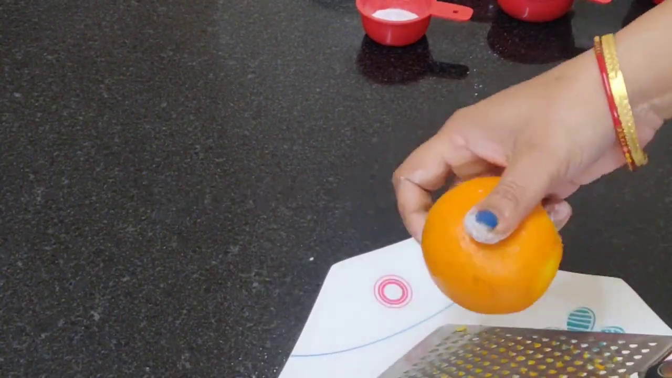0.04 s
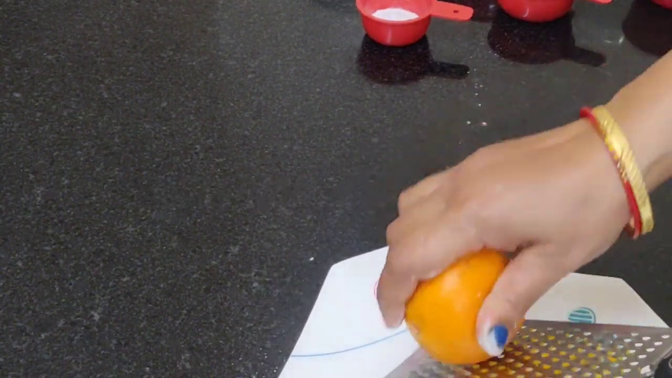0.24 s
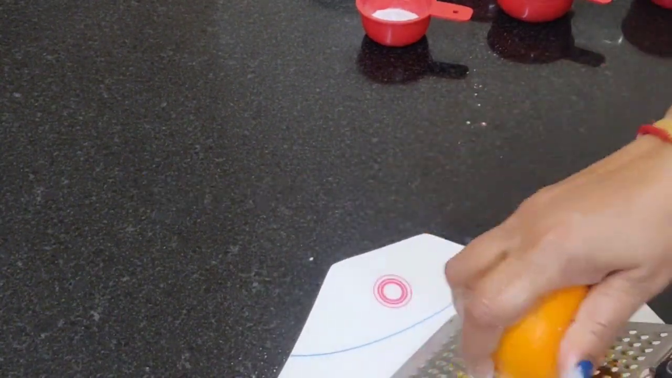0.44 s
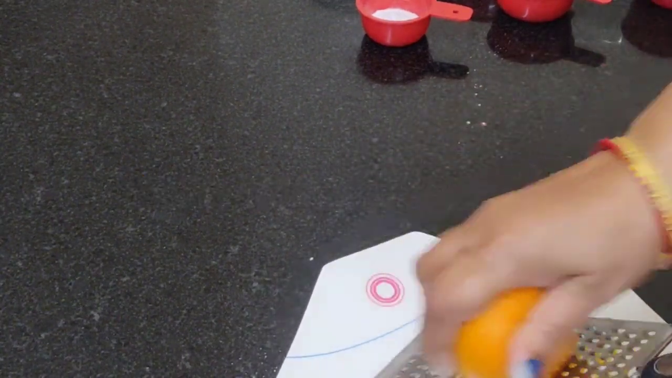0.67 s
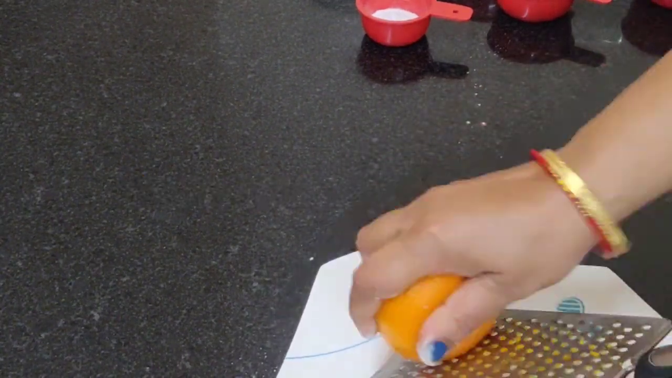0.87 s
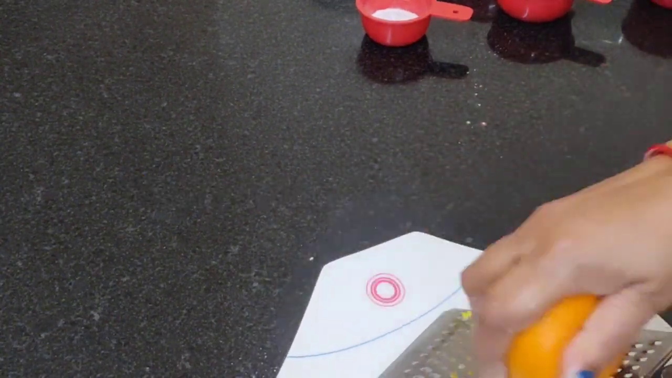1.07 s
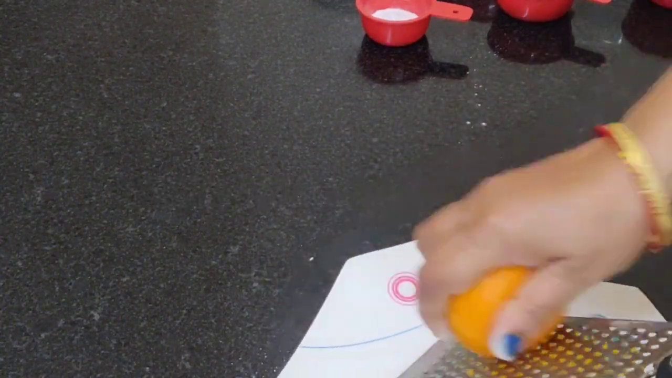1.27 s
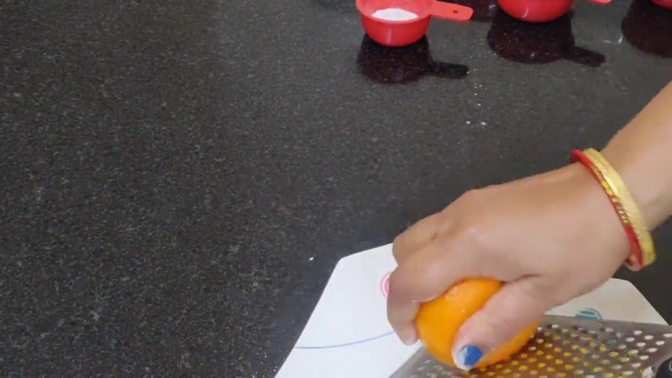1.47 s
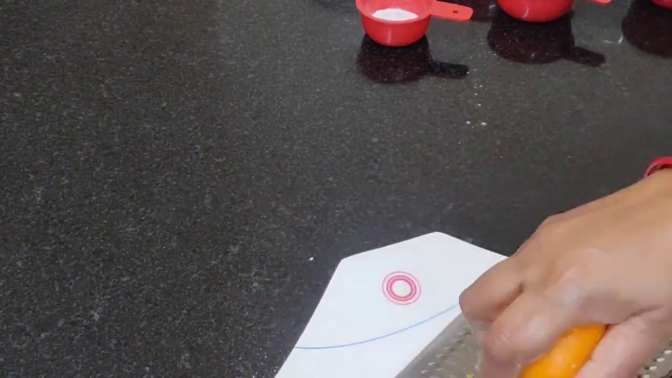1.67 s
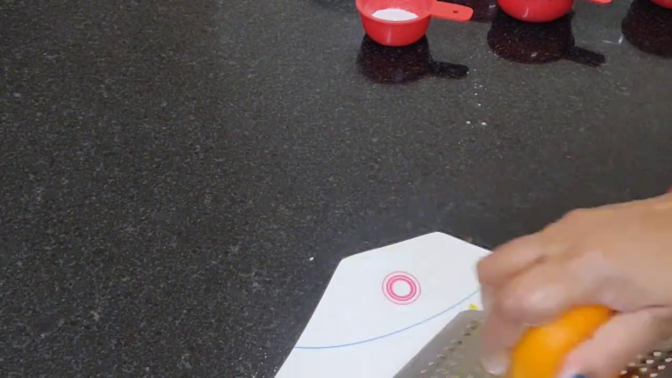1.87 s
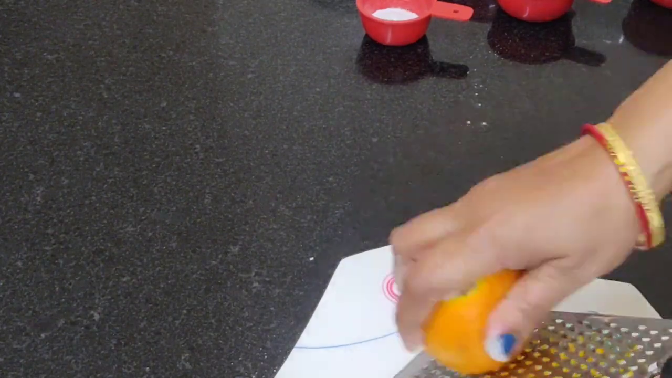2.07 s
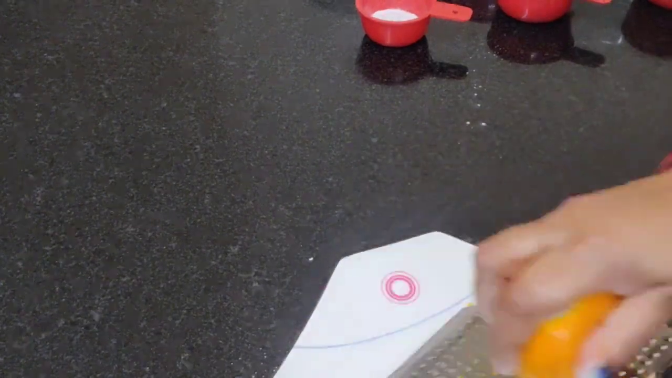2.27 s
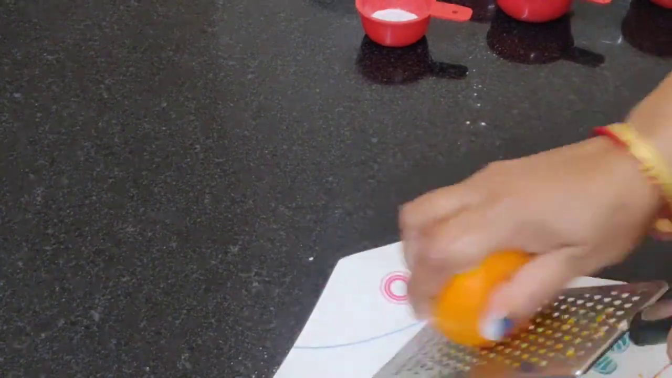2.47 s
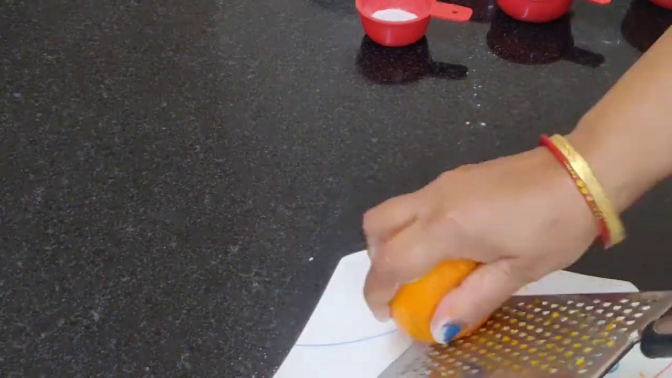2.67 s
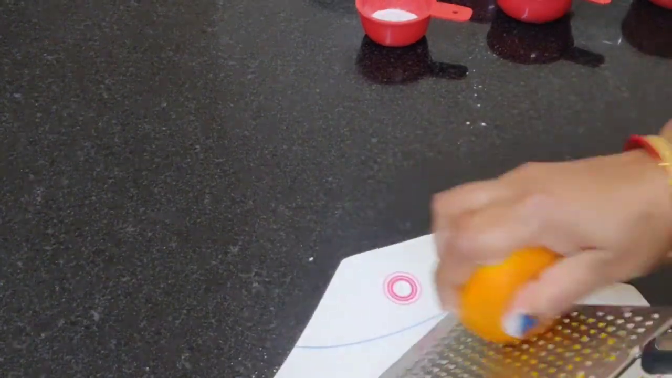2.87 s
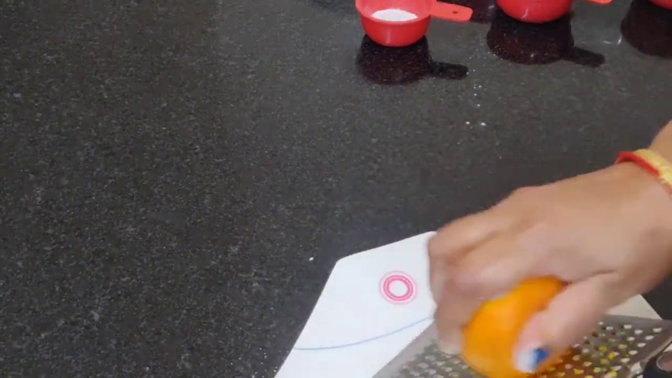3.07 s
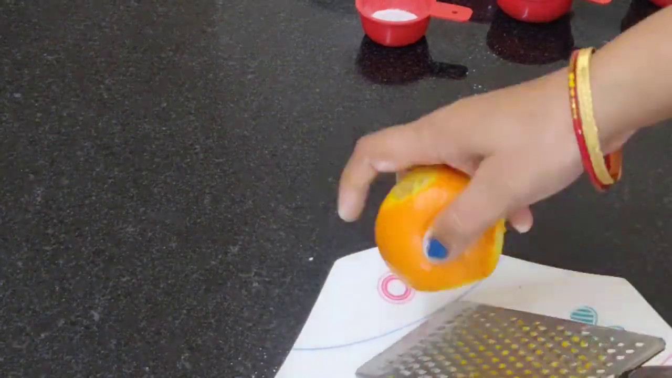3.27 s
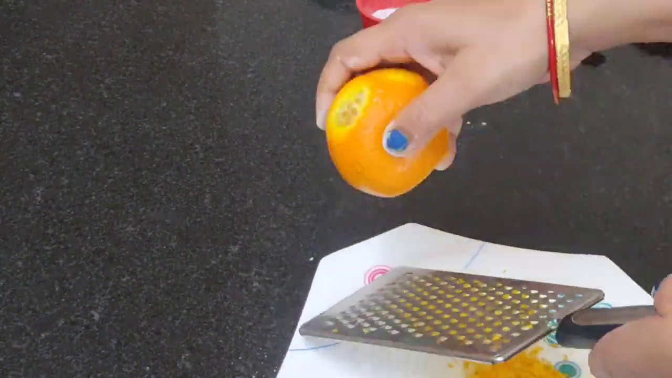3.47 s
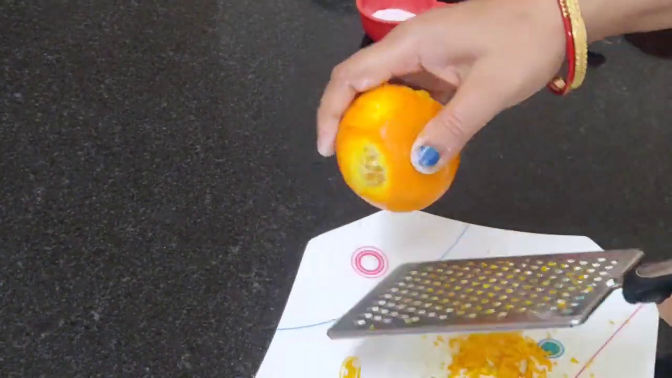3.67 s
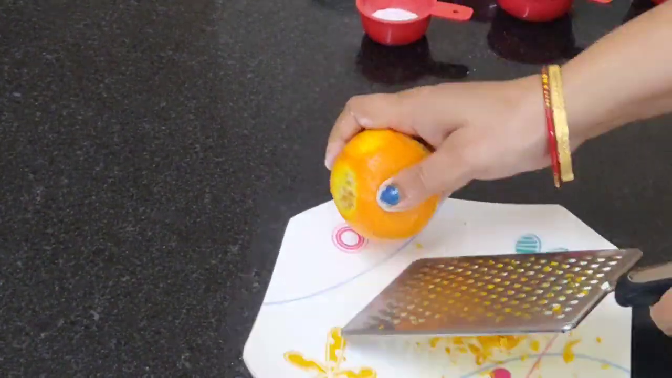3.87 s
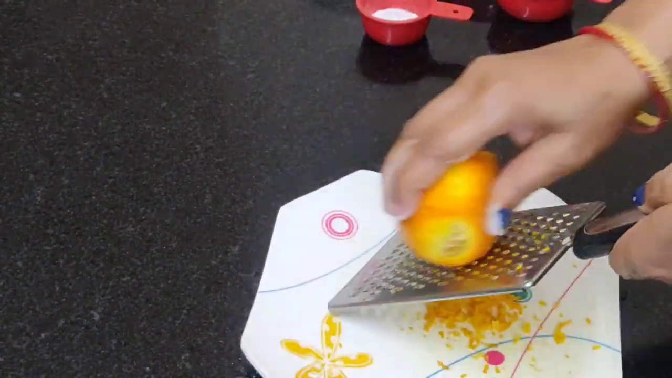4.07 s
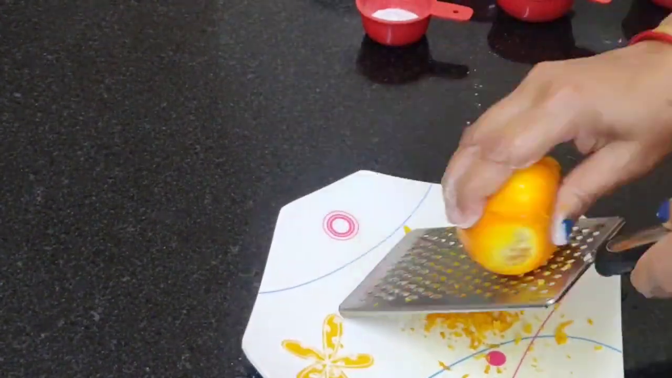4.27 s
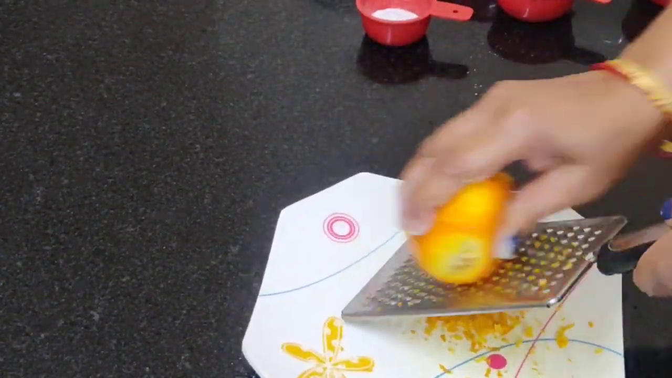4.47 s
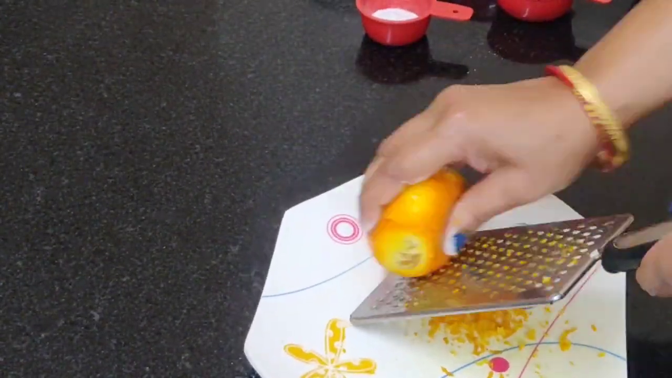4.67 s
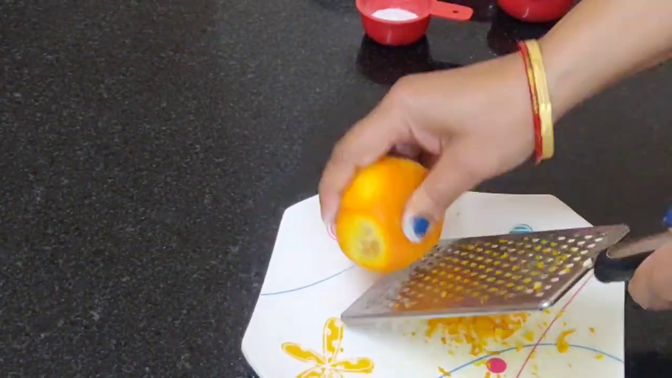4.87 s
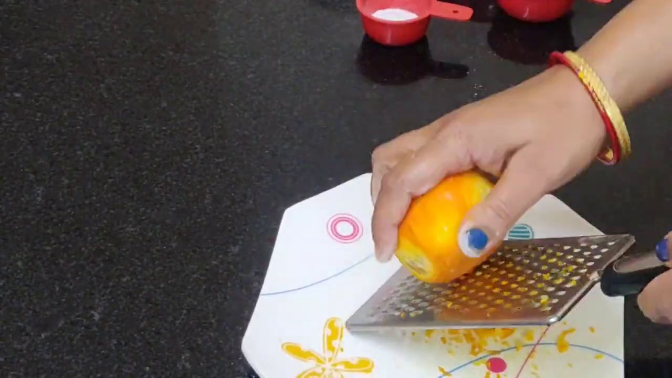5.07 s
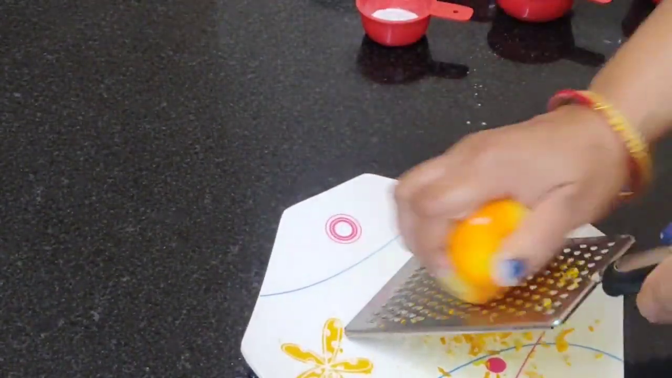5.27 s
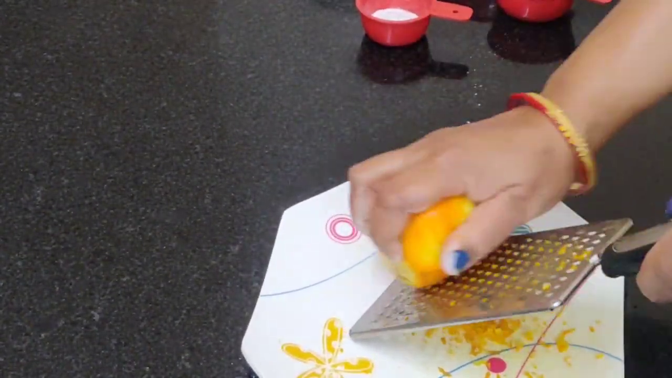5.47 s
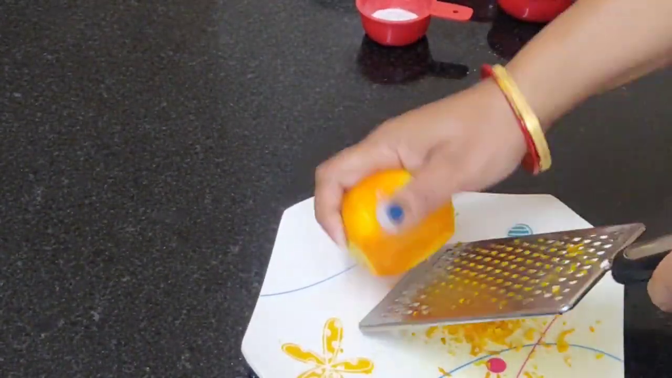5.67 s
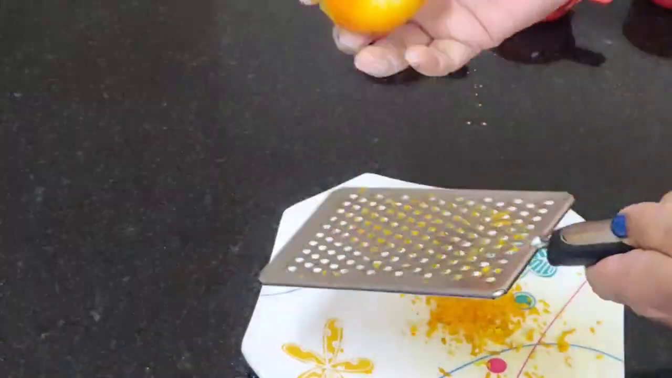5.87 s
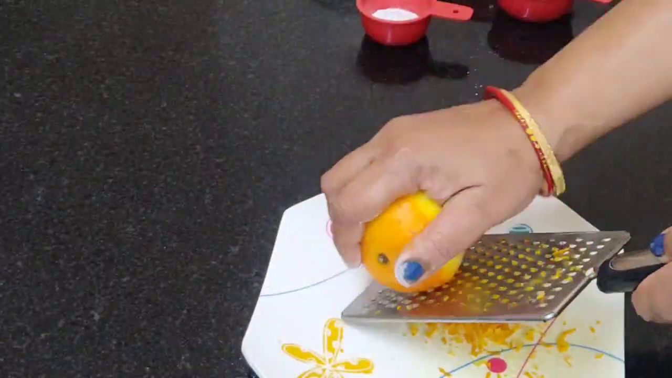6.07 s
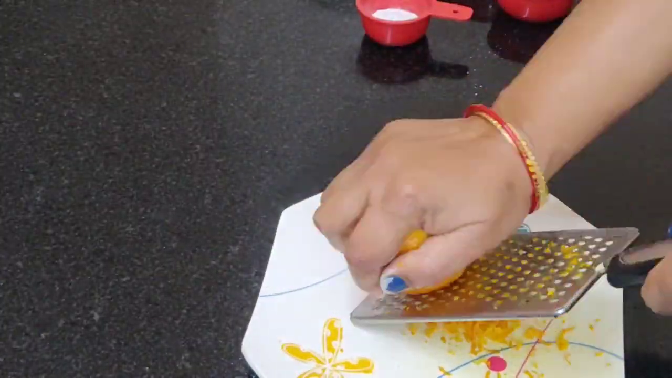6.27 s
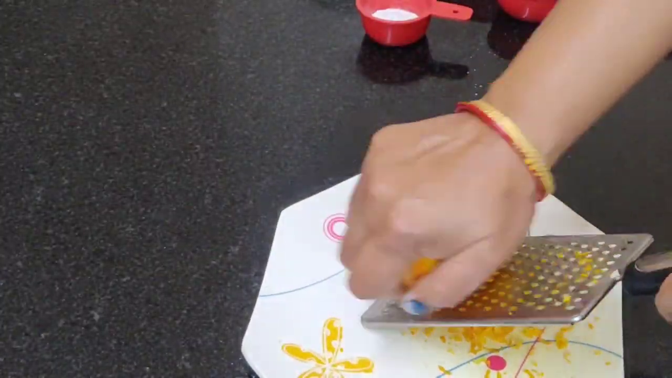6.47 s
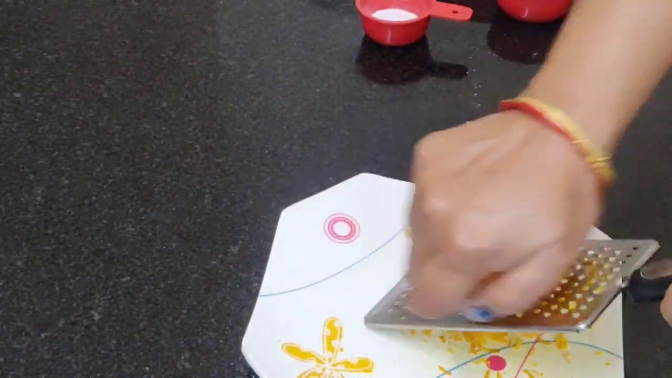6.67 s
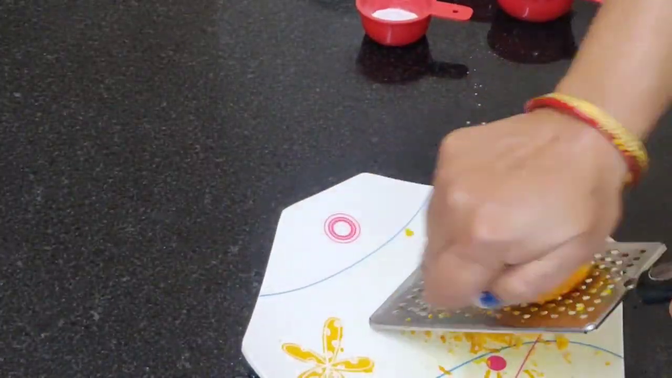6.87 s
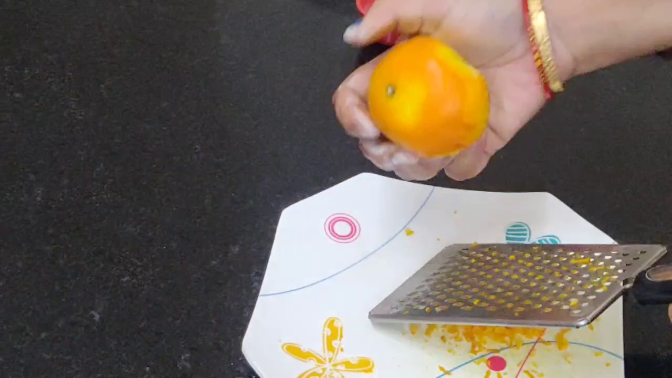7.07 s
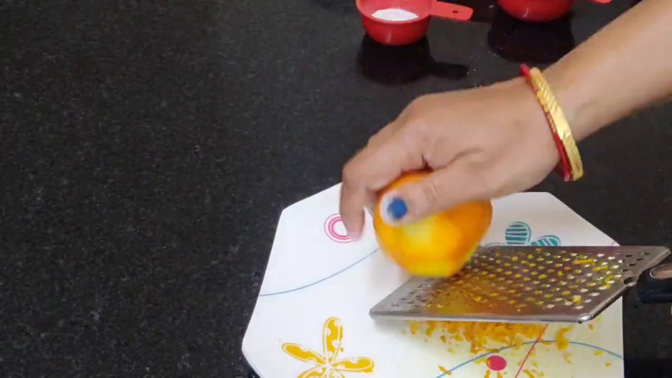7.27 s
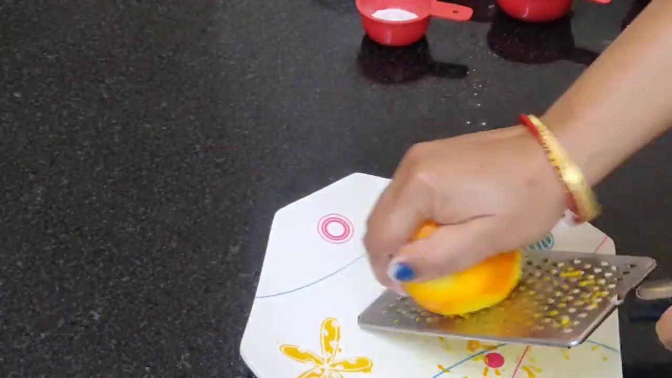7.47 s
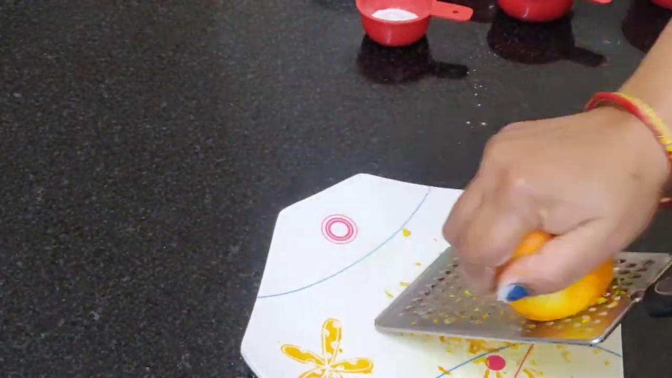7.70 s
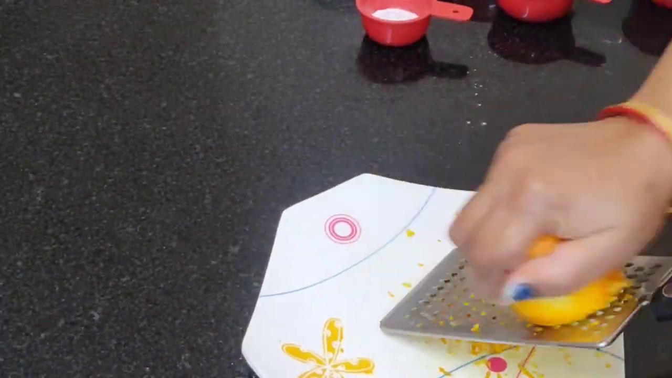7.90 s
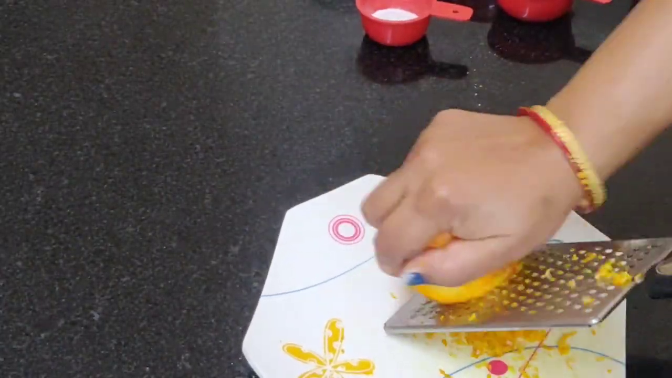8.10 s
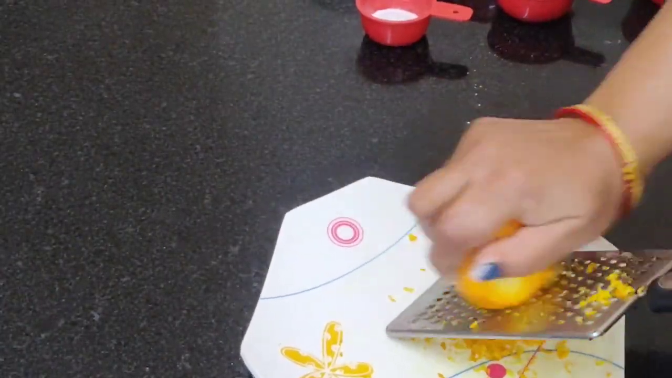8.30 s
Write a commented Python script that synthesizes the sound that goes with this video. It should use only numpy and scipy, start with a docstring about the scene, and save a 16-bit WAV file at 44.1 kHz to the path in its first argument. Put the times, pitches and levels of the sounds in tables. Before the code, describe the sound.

Close phone pickup in a quiet kitchen with a low hum and faint hiss. A faint scrape fades, then at 0.4 s a small knock on a dish and two soft rasps. Long, loud, gritty strokes of peel on a steel grater follow at 0.9, 1.2 and 1.5 s, quickening to rapid strokes until 1.9 s. A sharp metallic clank at 2.1 s, then lighter rasps grow into a fast strong run from 2.3 to 3.2 s. A pause has faint scuffs, a dull knock at 3.9 s and a bright clank at 4.03 s. Brisk grating resumes 4.1-4.9 s, 5.2-5.7 s and 6.05-7.0 s, separated by small knocks; one at 7.03 s rings hollowly. A final bout runs from 7.4 s to the end, around 8.3 s. Thin bangles jingle high and bright throughout the strokes; reverberation is short.

```python
"""A quiet kitchen hums around a phone with two microphone ports. After a faint scrape and a knock on a dish,
an orange is grated on a flat steel grater in quick strokes to and fro with pauses. More knocks, some with short
noisy tails, and faint scrapes fall between. Peel slips over the teeth in dense tiny jerks of noise that ring the
sheet and the dish. Bangles jingle at the wrist as chattering noise through high resonances, and counter and
walls add a short diffuse tail."""
import sys
import numpy as np
from scipy import signal
from scipy.fft import rfft, irfft, next_fast_len
from scipy.io import wavfile
from scipy.ndimage import uniform_filter1d

SR = 44100
rng = np.random.default_rng(int(sys.argv[2]) if len(sys.argv) > 2 else 0)


def generate_wav(signal):
    """Clip the signal to [-1, 1] and save it as 16-bit WAV at the path in sys.argv[1]."""
    frames = np.transpose(np.atleast_2d(signal))
    scaled = np.clip(frames, -1, 1) * 32767
    pcm = np.round(scaled).astype(np.int16)
    wavfile.write(sys.argv[1], SR, pcm)


N = 367794
TIME = np.arange(N) / SR
SIZE = next_fast_len(N + SR // 2)  # transform length, with space for tails
HZ = np.maximum(np.arange(SIZE // 2 + 1) * SR / SIZE, 1.)

# colour of each bout of strokes: from_s, dish_weight_db, thud_db, lowest_dish_mode_db, low_sheet_db,
# high_sheet_db, teeth_db, then six extra rings [dB], one for each of LOOSE_MODES
BOUT_COLOURS = [(0, -1, -3, 0, -3, -8, -9, -6, -12, -6, -12, -20, -20),
                (.37, -2, 4, 3, -2.5, -1.5, 0, -7, -2, 0, -10, -10, -14),
                (.83, -2, 4, 3, -3, -3.5, -.5, -9, -1, -12, 2.5, -16, -14),
                (1.45, 1.5, 0, 0, 1.5, -1.5, -.5, -2, -2, 2, -3, -14, -8),
                (2.05, -5, 9, 3, 0, -.5, -1, -9, 3, 0, 0, -14, -10),
                (3.3, -1, -2, 0, 0, 5, 1, -6, 0, -6, -3, -3, -8),
                (4.02, -1.5, 5, 2, -1, 1.5, -1, 3, -6, -6, 0, -8, -4),
                (5.05, 3.5, -2, -1, 1.5, 1.5, .5, 8, -12, 2, -10, -10, -3),
                (5.9, 2.5, -2.5, -3, 1.5, 1.5, -1, 6, -12, -4, -4, -10, -10),
                (6.45, 5.5, -.5, -1.5, 4, 0, -2, 7, -18, -6, -6, -2, -14),
                (7.2, 5.5, -3.5, -3.5, 4.5, 1.5, -.3, 2, -18, -4, -10, -4, -18)]
# sheet modes that ring more or less with where fruit and hand press; the first rings on when the peel is off:
# mode_hz, width_hz (3 dB down)
LOOSE_MODES = [(920, 18), (1152, 40), (2005, 70), (2285, 90), (2720, 90), (3300, 110)]


def undb(db):
    """Amplitude ratio of a level in dB."""
    return 10 ** (np.asarray(db) / 20)


def along(table):
    """Join (Hz, value) points on a log-frequency axis."""
    hz, value = np.transpose(table)
    return np.interp(np.log(HZ), np.log(np.maximum(hz, 1.)), value)


def causal(db):
    """Minimum-phase response with the given gain, from the folded cepstrum."""
    cep = irfft(db * np.log(10) / 20, SIZE)
    cep[1:SIZE // 2] *= 2
    cep[SIZE // 2 + 1:] = 0
    return np.exp(rfft(cep))


def body(modes, between_db):
    """Power gain in dB of resonant peaks standing on a broad colour; each width is taken 6 dB down."""
    power = undb(2 * between_db)
    for hz, width, db in modes:
        power = power + undb(2 * db) / (1 + (2 * (HZ - hz) / width) ** 2) ** 2
    return 10 * np.log10(power)


def ring_db_of(hz, width):
    """Gain in dB of one resonance that peaks at 0 dB; the width is taken 3 dB down."""
    return -10 * np.log10(1 + (2 * (HZ - hz) / width) ** 2)


def peak(x, hz, width_hz):
    """Resonant band-pass, gain 1 at the centre."""
    return signal.lfilter(*signal.iirpeak(hz, hz / width_hz, fs=SR), x)


def ports(first, second):
    """Two unrelated spectra of one sound shared out so that the ports agree only in part."""
    # level between the ports: pitch_hz, left_minus_right_db
    port_balance = [(30, 6), (125, 8), (250, 5), (500, 4.5), (1000, 6), (2000, 5), (3500, 4), (5500, 9),
                    (7500, 5), (9500, -4.5), (12000, 3), (15000, 1)]
    # likeness of the ports: pitch_hz, likeness (0-1)
    port_likeness = [(30, 0.8), (120, 0.8), (250, 0.9), (500, 0.93), (1000, 0.3), (2000, 0.42),
                     (4000, 0.07), (8000, 0.01), (16000, 0.44)]
    # phase between the ports: pitch_hz, left_lead_radians
    port_phase = [(0, 1), (690, 0.1), (1120, 0.7), (1810, 0.5), (3190, 0.42), (4910, -2.5), (5860, -0.5),
                  (6890, -4), (8100, -2), (9390, -3.5), (10300, -1), (10800, -2.5), (13600, -2),
                  (16100, 2.6)]
    like = np.clip(along(port_likeness), 0, .99)
    mid = first * np.sqrt((1 + like) / 2)
    side = second * np.sqrt((1 - like) / 2)
    tilt = undb(along(port_balance) / 2) * np.exp(.5j * along(port_phase))
    return np.array([(mid + side) * tilt, (mid - side) / tilt])


def swells(times, db, rise_ms, fall_ms, round_ms):
    """Pressure over time: quick rises and exponential falls (ms per 10 dB) added in power, with rounded tops."""
    bite = 1.45  # above 1 the peel catches suddenly and then holds its pressure
    power = np.zeros(N)
    for s, d, rise, fall in zip(times, db, rise_ms, fall_ms):
        near = slice(max(int((s - .4) * SR), 0), int((s + .5) * SR))
        ms = (TIME[near] - s) * 1000
        before = np.abs(ms / max(rise, 1.)) ** bite
        after = ms / max(fall, 1.)
        power[near] += undb(2 * d - 20 * np.where(ms < 0, before, after))
    rounded = uniform_filter1d(power, max(int(round_ms * SR / 1000), 1))
    return np.sqrt(rounded.clip(0))


def jerks(rate, scatter_db, smooth):
    """Two unrelated trains of slips at shared moments and sizes over a share of smooth friction; rms 1."""
    steps = np.minimum(rng.exponential(1, N), 3)
    size = (rng.random(N) < rate / SR) * undb(scatter_db * steps)
    size = size / np.sqrt(np.mean(size ** 2))
    share = np.clip(smooth, 0, 1)
    return rng.standard_normal((2, N)) * np.sqrt(share + (1 - share) * size ** 2)


def flutter(rate, depth_db):
    """Uneven level: a random value in dB every 1 / rate s, with straight slides between."""
    k = int(SR / rate)
    held = np.repeat(rng.standard_normal(N // k + 1), k)
    return undb(depth_db * uniform_filter1d(held, k)[:N])


def kitchen():
    """Distant hum and hiss: coloured noise, wavering slightly, with low tones that swell and fade."""
    # colour of the hum and hiss: pitch_hz, relative_level_db (per Hz)
    room_colour = [(13, -14), (30, -2), (58, -9), (100, -2), (138, -.5), (169, -5.5), (205, -10.5),
                   (328, -8), (585, -13.5), (1200, -24.5), (7390, -36.5), (8970, -34.5), (12800, -36),
                   (14700, -32.5), (16000, -42)]
    # low tones, narrow bands of noise: pitch_hz, width_hz (3 dB down), level_db (rms)
    murmur = [(95, 14, -73), (140, 12, -66), (190, 20, -76)]
    bed_db = -58.3  # rms of the mean of both ports
    noise = rng.standard_normal((2, N)) * flutter(6.7, 1.14)
    coloured = rfft(noise, SIZE) * undb(along(room_colour))
    sound = irfft(ports(*coloured), SIZE)[:, :N]
    sound = sound * undb(bed_db) / np.sqrt(np.mean(sound.mean(axis=0) ** 2))
    for hz, width_hz, db in murmur:
        tone = peak(rng.standard_normal(N), hz, width_hz) * flutter(4., 5.)
        # stronger on the left
        sound = sound + undb(db + np.array([[3.], [-3.]])) * tone / np.std(tone)
    return sound


def grater_db():
    """Gain in dB of dish, sheet and teeth: their resonances over the broad colour of the rasp."""
    # resonances of the dish: mode_hz, width_hz (6 dB down), level_db
    dish_modes = [(196, 69, -9), (339, 54, -5.5), (425.5, 55, -2), (507, 50, -1.5), (583.4, 53, -2.5),
                  (668.4, 45, -3.5), (760, 70, -9), (863, 66, -2.5)]
    # resonances of the steel sheet: mode_hz, width_hz (6 dB down), level_db
    sheet_modes = [(915, 30, -9), (1120, 90, -10), (1308, 49, -7.5), (1420, 40, -21.5), (1870, 100, -10),
                   (2015, 116, -9), (2217, 66, -9), (2360, 97, -7), (2590, 140, -14), (3020, 93, -10.5),
                   (3265, 124, -13), (3550, 27, -40)]
    # resonances of the teeth: mode_hz, width_hz (6 dB down), level_db
    teeth_modes = [(4324, 140, -14), (5350, 77, -17), (5800, 130, -15), (6120, 105, -12),
                   (6540, 330, -12.5), (7260, 120, -22.5)]
    # broad colour between the resonances: pitch_hz, level_db
    rasp_colour = [(25, -40), (70, -35), (150, -20), (270, -27.5), (500, -8), (1000, -13), (1600, -14),
                   (2500, -10.5), (4500, -17.7), (6800, -17.5), (8000, -25), (10000, -36.5), (13000, -33),
                   (16000, -26.5)]
    return body(dish_modes + sheet_modes + teeth_modes, along(rasp_colour))


def slides():
    """Rows (s, dB, rise ms, fall ms, weight dB) of strokes, pulls back, faint scrapes and tails after knocks."""
    # strokes over the teeth: peak_s, level_db, fall_ms (per 10 dB), own_dish_weight_db,
    # pull_back_level_db (only where one is heard)
    stroke_list = [(.414, -30, 50, 1, -35), (.585, -31, 75, -2.5, -36), (.9, -17.5, 70, 0, -28.5),
                   (1.208, -14.5, 64, 0, -24.5), (1.497, -18.5, 58, 0, -31), (1.624, -17, 19, 1, -27),
                   (1.716, -18, 19, 0, -30), (1.806, -18, 19, 1, -27.5), (1.9, -20.5, 22, -2.5),
                   (2.156, -35.5, 50, 0), (2.267, -27.5, 44, 0), (2.348, -25, 27, 2, -27),
                   (2.441, -20.5, 26, 0, -36), (2.526, -22, 28, 0, -29), (2.64, -29, 24, 0),
                   (2.694, -20, 20, 0, -27.5), (2.785, -16, 16, -3.5, -27), (2.873, -16, 13, 0, -25),
                   (2.953, -20, 32, 0), (2.99, -22.5, 18, -2), (3.039, -20.5, 24, 0, -30),
                   (3.109, -24.5, 19, 0, -32), (3.2, -28, 17, 0), (4.107, -24.5, 20, 0, -36),
                   (4.222, -28, 30, -2, -38), (4.316, -20.5, 16, 0, -31), (4.405, -18, 20, -2.5, -33),
                   (4.498, -18, 20, 2.5, -32), (4.594, -22.5, 30, 2.5, -33), (4.676, -21.5, 45, 1.5),
                   (4.764, -27.5, 26, 0, -28), (4.85, -23, 19, 1.5), (4.915, -30.5, 14, 0),
                   (5.173, -23, 20, 3.5, -34), (5.253, -20.5, 35, 0, -27), (5.339, -17.5, 19, 1, -25.5),
                   (5.425, -20.5, 29, 0, -33), (5.506, -21, 28, -1, -23.5), (5.591, -17.5, 24, 0, -30),
                   (5.674, -23, 33, 3.5), (6.052, -28, 24, -4, -38.5), (6.186, -26, 30, 0, -36.5),
                   (6.293, -28.5, 16, 2, -31.5), (6.389, -29.5, 27, 0, -35), (6.476, -24, 15, 0, -33),
                   (6.566, -22, 16, 0, -26.5), (6.658, -20.5, 18, 0, -29), (6.742, -23.5, 30, 0, -31),
                   (6.832, -26.5, 48, 0, -28), (6.915, -21.5, 17, 0, -29), (7.009, -18.5, 18, -2.5),
                   (7.384, -25, 26, 0, -31.5), (7.497, -38, 45, 0), (7.576, -27.5, 36, -4.5, -28.5),
                   (7.665, -27.6, 25, 3, -27.5), (7.754, -24, 25, 1, -28), (7.846, -20.5, 23, -2, -26),
                   (7.939, -22, 22, 1.5, -27.5), (8.028, -23.5, 27, 0, -29.5), (8.109, -27, 42, 1, -32.5),
                   (8.198, -30.5, 40, -1, -31.5), (8.287, -26, 32, 0)]
    # faint scrapes, and short noisy tails after knocks: peak_s, level_db, fall_ms (per 10 dB), dish_weight_db
    scrape_and_tail_list = [(.01, -42.5, 390, -.5), (2.108, -34, 15, 2.5), (3.504, -42.5, 90, -4.5),
                            (3.626, -46.5, 35, -15), (3.822, -38.5, 23, 9.5), (3.875, -32, 40, -6.5),
                            (3.937, -43.5, 24, 16.5), (4.058, -31, 17, -7.5), (5.103, -40.5, 35, 12),
                            (7.058, -43.5, 35, 5.5), (7.338, -37, 24, 5)]
    rise_share = .6  # rise time over fall time
    pull_at, pull_rise, pull_fall = .49, .3, .25  # shares of the time to the next stroke
    pull_weight_db = -6  # the hand eases off the dish on the way back
    # the dish takes only this share of a stroke's dB above or below the usual
    usual_db, dish_follows = -22, .7
    rows = [(s, db, rise_share * fall, fall, weight) for s, db, fall, weight in scrape_and_tail_list]
    for (s, db, fall, own_db, *pull), after in zip(stroke_list, stroke_list[1:] + [None]):
        bout_weight = [bout[1] for bout in BOUT_COLOURS if bout[0] <= s][-1]
        weight = bout_weight + own_db + (dish_follows - 1) * (db - usual_db)
        rows.append((s, db, rise_share * fall, fall, weight))
        if pull:
            gap = after[0] - s
            weight = bout_weight + pull_weight_db + (dish_follows - 1) * (pull[0] - usual_db)
            rows.append((s + pull_at * gap, pull[0], 1000 * pull_rise * gap, 1000 * pull_fall * gap, weight))
    return np.transpose(rows)


def strokes():
    """All slides: jerky friction noise rings sheet and teeth; the dish takes its own share of the weight."""
    s, db, rise, fall, dish_db = slides()
    from_s, _, *colour_db = np.transpose(BOUT_COLOURS)
    bout = np.searchsorted(from_s[1:], TIME)
    thud, dish, low, high, teeth, *rings = (undb(c[bout]) for c in colour_db)
    press = swells(s, db, rise, fall, 2.1) * flutter(110., 1.6) * jerks(1500., 2.6, 0.74)
    weight = swells(s, db + dish_db, rise, fall, 6.6) * flutter(60., 1.83) * jerks(2000., 3.3, 0.43)
    # single teeth snag in the peel 260 times per s, below the dense slips
    catches = undb(-9) * swells(s, db, rise, fall, 2.) * jerks(260, 4., 0)
    sharp = .92 * press + catches
    forces = (weight * thud, weight * dish, weight, press * low, sharp, sharp * high, sharp * teeth)
    tops_hz = [280, 380, 820, 1450, 2700, 4800]  # upper edge of each force but the last
    centres = np.geomspace(140, 14000, 26)
    out = 0
    # the contact wanders over the sheet, so each group of modes is fed unevenly
    for k, hz in enumerate(centres):
        share = np.interp(np.log(HZ), np.log(centres), np.arange(len(centres)) == k)
        wander = flutter(30., 2.2 if hz < 750 else 3.6)
        force = forces[np.searchsorted(tops_hz, hz)]
        out = out + rfft(force * wander, SIZE) * np.sqrt(share)
    out = out * causal(grater_db())
    for fed, mode in zip(rings, LOOSE_MODES):
        ring_force = press * fed * flutter(16., 5.2)
        out = out + rfft(ring_force, SIZE) * causal(ring_db_of(*mode) - 9.5)
    return out


def knocks():
    """A clean blow clangs the sheet near one pitch; contact rattles out into dish, sheet, teeth and free ring."""
    # grater against dish, bounces included: start_s, dish_and_low_sheet_db, sheet_db, teeth_db, free_ring_db,
    # rattle_ms (time constant), clang_hz, clang_width_hz (6 dB down), clang_db
    knock_list = [(.3843, -7, -3, -3, -1, 5.3, 2500, 2600, 1), (2.0824, -5, -3, -1, -9, 7.5, 2270, 700, 12),
                  (2.0858, -9, -6, -6, -20, 5, 3250, 900, 3), (3.9145, -9, -11, -19, -8, 14, 720, 400, 4.5),
                  (4.0338, -6, 1, 2, 0, 8, 2700, 2200, 10), (4.0402, -10, -8, -8, -20, 4, 2350, 1500, 5),
                  (4.0435, -14, -10, -12, -20, 4, 2300, 1200, 1),
                  (4.908, -18, -15, -16, -20, 4, 2400, 1700, -13),
                  (5.0791, -6, -10, -14, -8, 4.6, 2500, 2400, -2),
                  (6.0185, -23, -34, -30, 7, 8, 520, 300, -11), (6.025, -22, -34, -30, 8, 6, 930, 150, 2),
                  (6.0315, -17, -28, -28, 6, 6, 440, 250, 2), (6.617, -5, -18, -15, 8, 4.8, 680, 1000, 5),
                  (6.785, -12, -15, -28, 0, 4.6, 2650, 1200, -2),
                  (6.835, -9, -18, -25, 0, 3.5, 2300, 1700, -10),
                  (6.873, -5, -14, -15, 8, 3.7, 2300, 1700, -3),
                  (7.0345, -2.5, -4, 4, 19, 5.1, 2000, 1700, 0),
                  (8.241, -10, -22, -28, -10, 4.5, 2300, 1700, -14)]
    # resonance rung by knocks only: mode_hz, width_hz (6 dB down), level_db
    rim_modes = [(8500, 1200, 2)]
    dish_top_hz, teeth_from_hz, contact_top_hz = 1500, 4200, 12000
    t = np.arange(SR // 12) / SR
    force = np.zeros((5, 2, N + len(t)))  # dish, sheet, teeth, free ring, clang
    for s, *part_db, ring_db, rattle_ms, clang_hz, width_hz, clang_db in knock_list:
        shape = (1 - np.exp(-t / 0.0005)) * (np.exp(-t / .0012) + 0.37 * np.exp(-1000 * t / rattle_ms))
        rattle = shape * rng.standard_normal((2, len(t)))
        i = int(s * SR)
        force[3, :, i] = undb(ring_db)  # one clean push sets the free mode going
        force[:3, :, i:i + len(t)] += undb(part_db)[:, None, None] * rattle
        blow = undb(-11) * rattle - (t == 0)  # a one-sample push with some rattle
        clang = peak(peak(blow, clang_hz, width_hz), clang_hz, width_hz)
        force[4, :, i:i + len(t)] += undb(clang_db) * clang
    # power shares of the parts
    low = 1 / (1 + (HZ / dish_top_hz) ** 8)
    high = 1 / (1 + (teeth_from_hz / HZ) ** 8)
    soft = undb(2 * body(rim_modes, 0.)) / (1 + (HZ / contact_top_hz) ** 6)
    shares = (low, (1 - low) * (1 - high), high * soft)
    gains = [grater_db() + 10 * np.log10(g + 1e-7) for g in shares]
    gains.append(ring_db_of(*LOOSE_MODES[0]))
    rattles = sum(rfft(f, SIZE) * causal(g) for f, g in zip(force, gains))
    loose = sum(causal(ring_db_of(*mode) - 8.) for mode in LOOSE_MODES[2:])
    return rattles + rfft(force[4], SIZE) * (causal(grater_db()) + loose)


def bangles():
    """Thin rings slide and chatter together: swells of jerky noise through high resonances."""
    # jingles: peak_s, level_db, length_ms (scales rise and fall)
    jingle_list = [(.635, -40, 78), (.946, -31, 91), (1.255, -42, 97), (1.533, -36, 80), (1.903, -39.6, 43),
                   (2.29, -34, 33), (2.718, -40, 45), (4.121, -34, 32), (4.245, -38, 59), (4.335, -34, 49),
                   (4.431, -38, 71), (4.52, -45, 66), (4.705, -47, 124), (4.877, -35, 33), (5.278, -43, 73),
                   (5.941, -32.5, 24), (6.289, -45, 37), (6.572, -38.2, 34), (6.66, -30.5, 24),
                   (6.75, -33.5, 34), (6.82, -42.2, 75), (7.504, -39.5, 65), (7.591, -29, 22),
                   (7.77, -45, 78), (8.136, -47.4, 77)]
    # resonances of the bangles: mode_hz, width_hz (6 dB down), level_db
    bangle_modes = [(6540, 460, -8), (8760, 330, -8), (10400, 300, -31), (11700, 300, -30),
                    (13200, 600, -8), (14200, 300, -.5), (14500, 600, -5), (14900, 400, -4),
                    (15300, 540, -12)]
    s, db, length = np.transpose(jingle_list)
    chatter = swells(s, db, 0.58 * length, 0.38 * length, 5.) * jerks(2200.0, 3., .4)
    rumble_db = -10 * np.log10(1 + (4400.0 / HZ) ** 4)  # light rings give no bass
    return rfft(chatter, SIZE) * causal(body(bangle_modes, -20.0 + rumble_db))


def room(near):
    """Direct sound plus a short diffuse tail from counter and walls; moving arms keep changing the reflections."""
    t60_s, tail_db, first_s = 0.24, -11, .004
    t = np.arange(SR // 3) / SR
    sound = irfft(near, SIZE)[:, :N]
    # six tails crossfade in turn, one every 1/6 s, and come round each second
    for k in range(6):
        tail = rng.standard_normal((2, len(t))) * np.exp(-np.log(1000) * t / t60_s) * (t > first_s)
        tail = tail / np.sqrt(np.sum(tail ** 2) / 2)
        turn = (6 * TIME - k + 3) % 6 - 3
        share = np.cos(np.pi / 2 * np.clip(turn, -1, 1))
        near = near + undb(tail_db) * rfft(tail, SIZE) * rfft(sound * share, SIZE)
    return near


def scene():
    """Grater and bangles sound in the room and reach both ports, over the kitchen."""
    near = ports(*room(strokes() + knocks() + bangles()))
    return irfft(near, SIZE)[:, :N] + kitchen()


def record(dry):
    """The phone cuts the top with a steep low-pass."""
    top_hz = 15720
    return signal.sosfilt(signal.ellip(10, .2, 70, top_hz, fs=SR, output="sos"), dry)


dry = scene()
out = record(dry)
generate_wav(out)
```